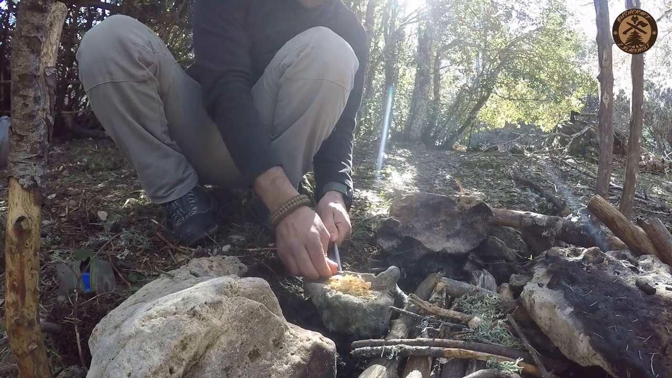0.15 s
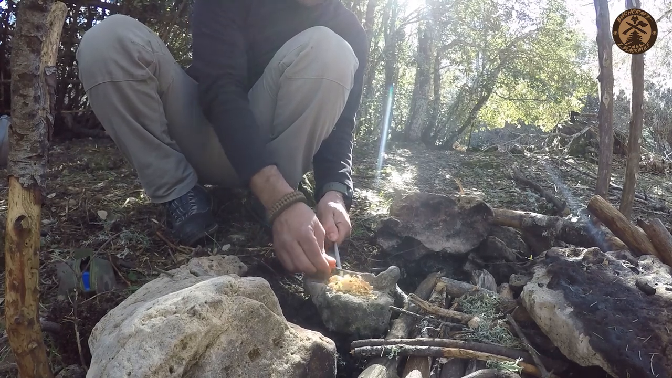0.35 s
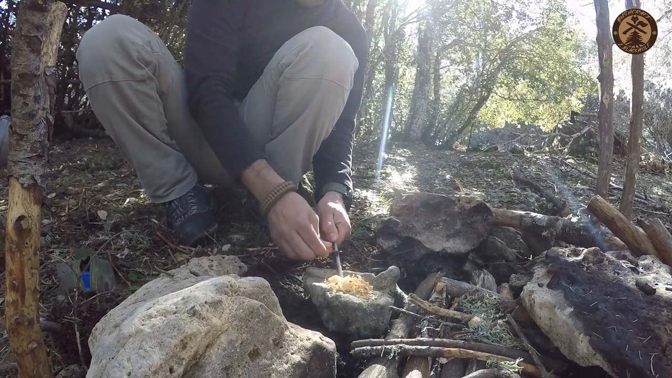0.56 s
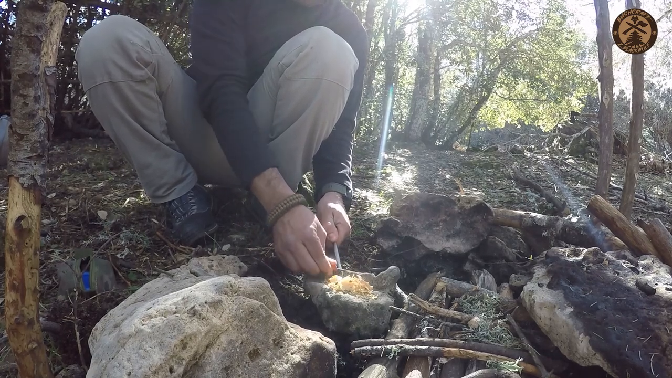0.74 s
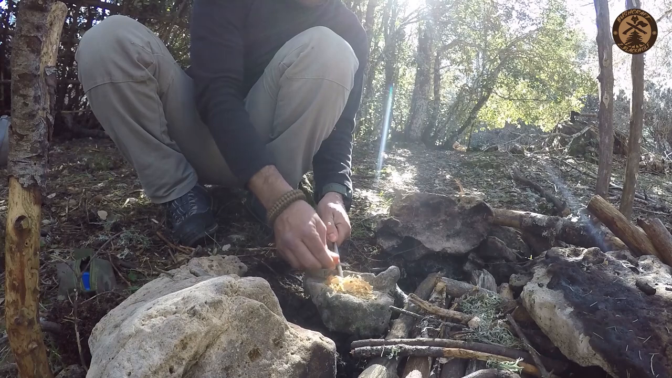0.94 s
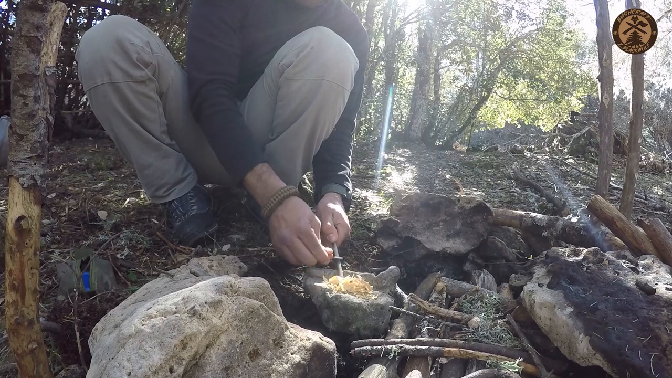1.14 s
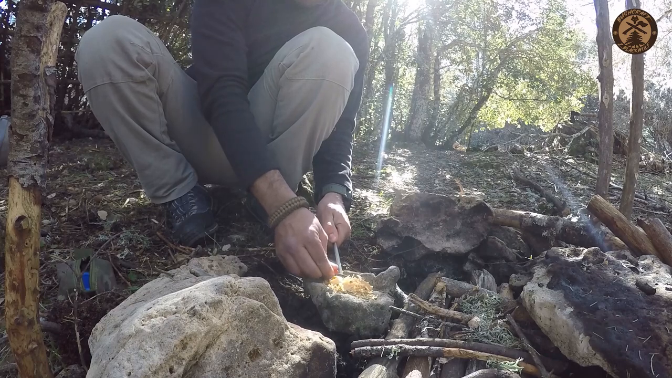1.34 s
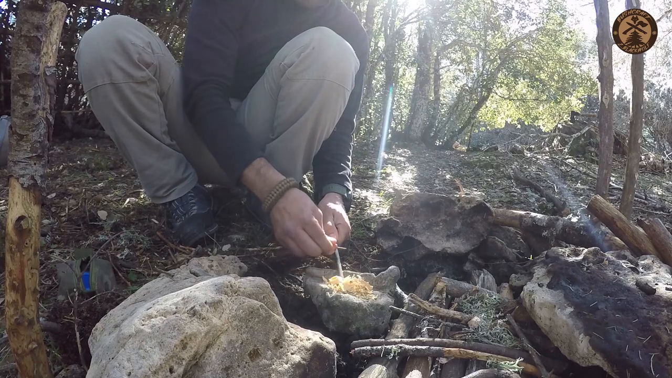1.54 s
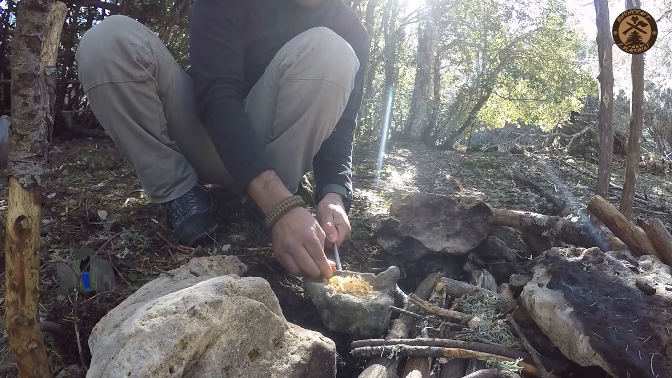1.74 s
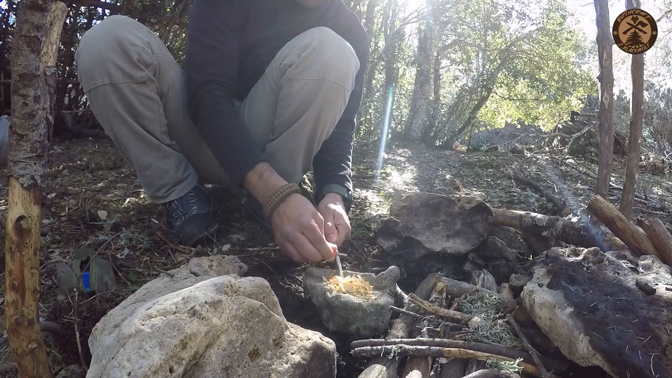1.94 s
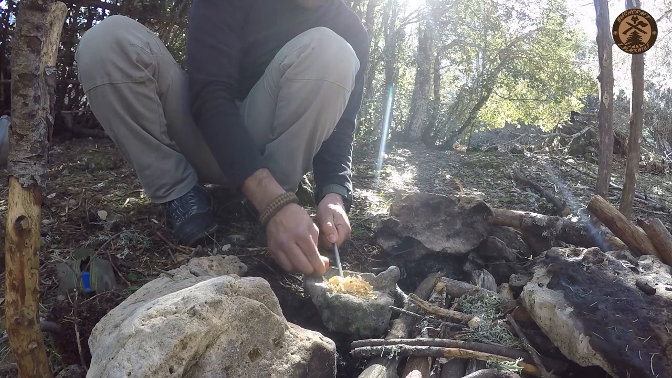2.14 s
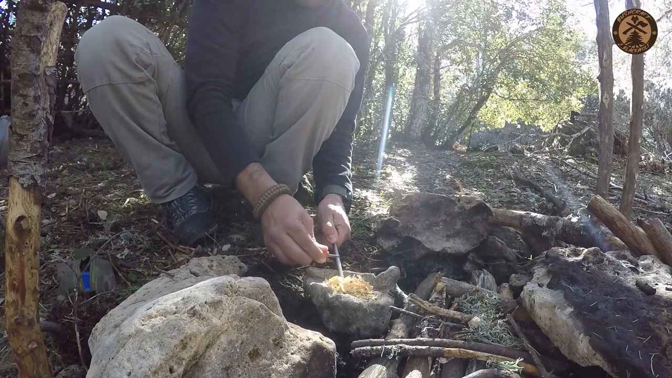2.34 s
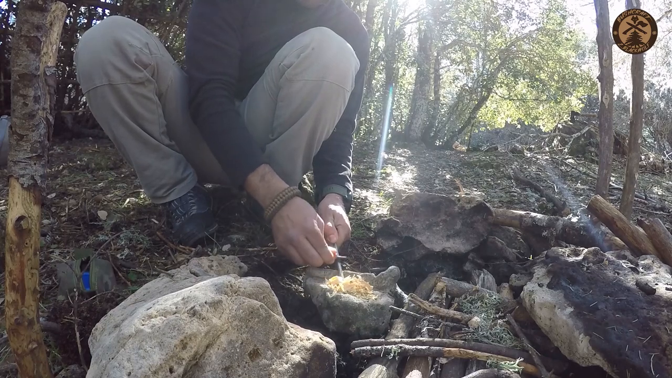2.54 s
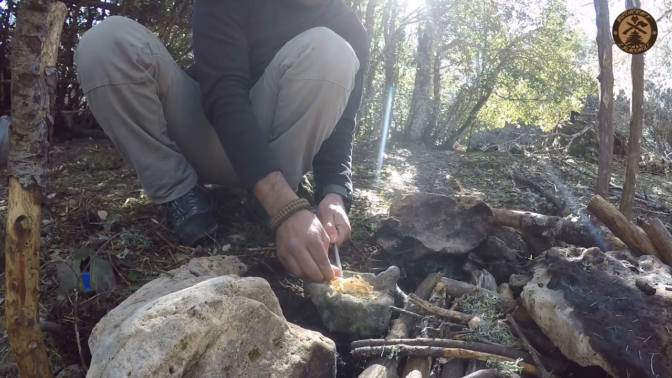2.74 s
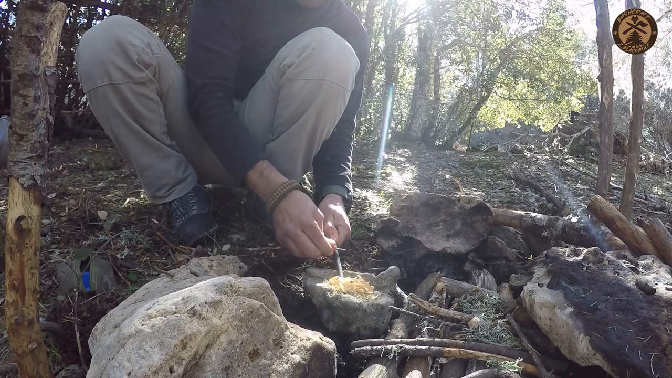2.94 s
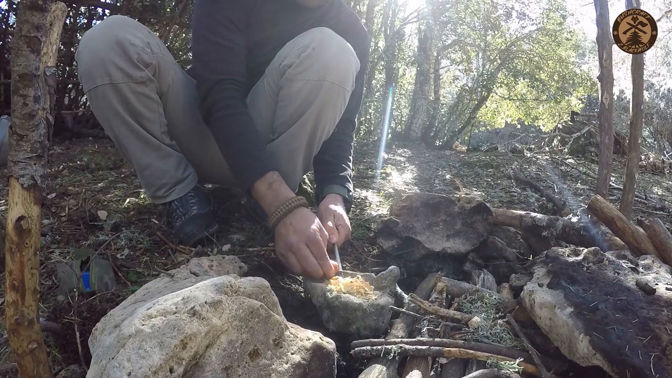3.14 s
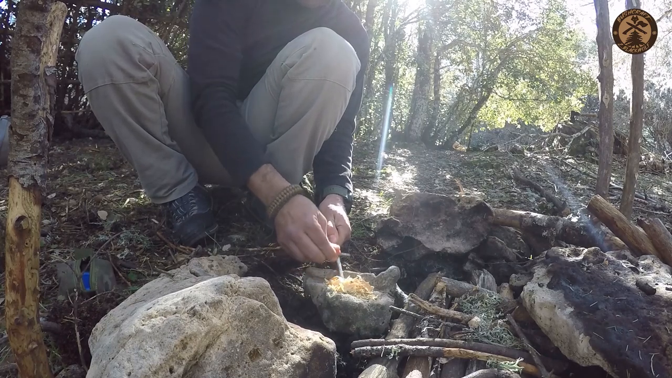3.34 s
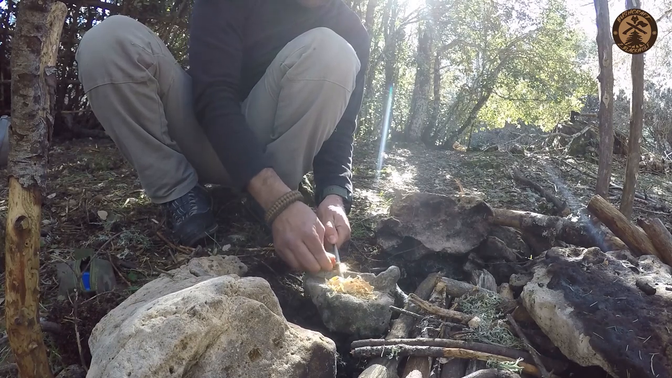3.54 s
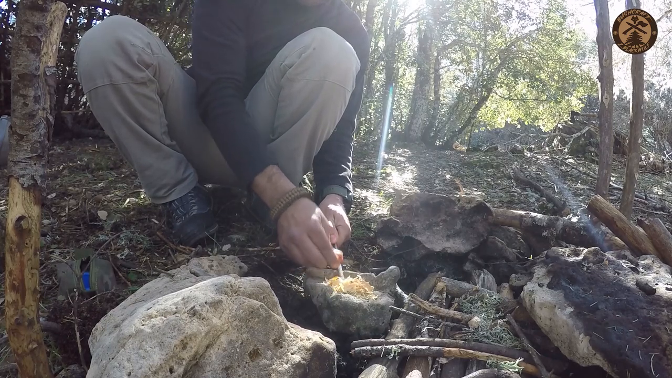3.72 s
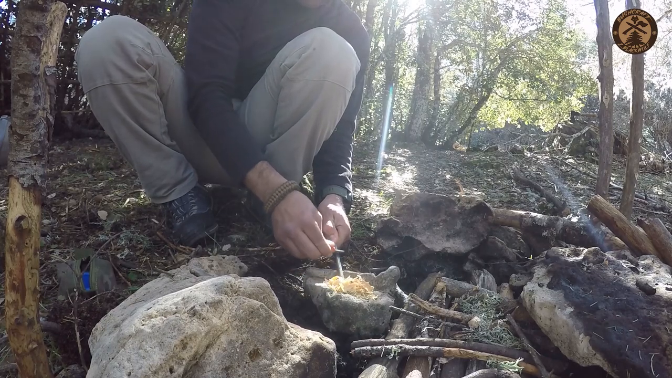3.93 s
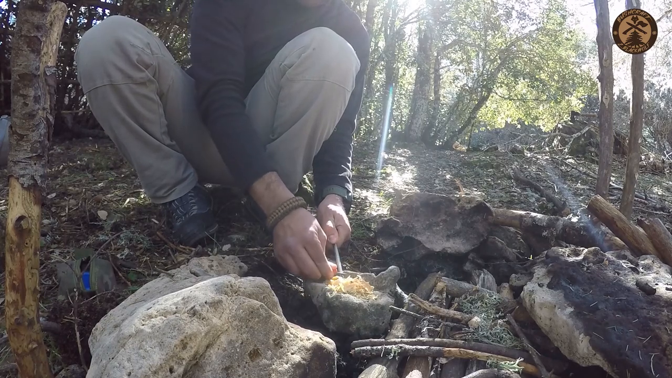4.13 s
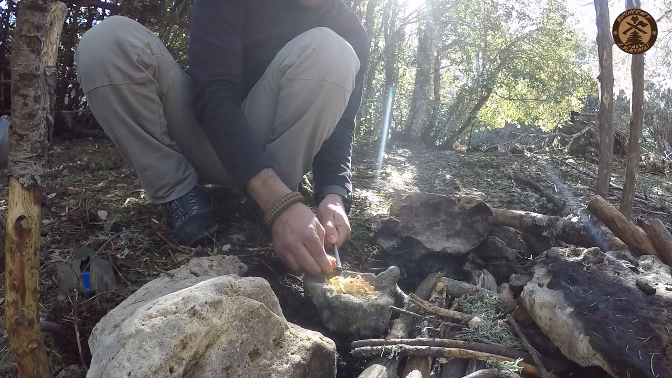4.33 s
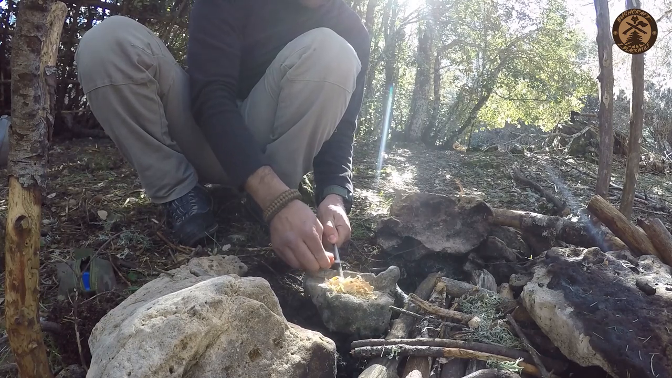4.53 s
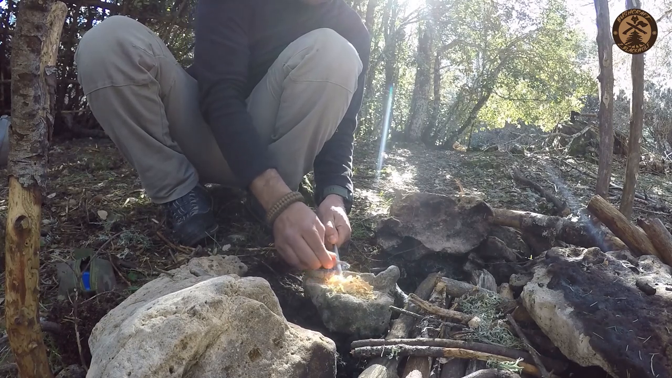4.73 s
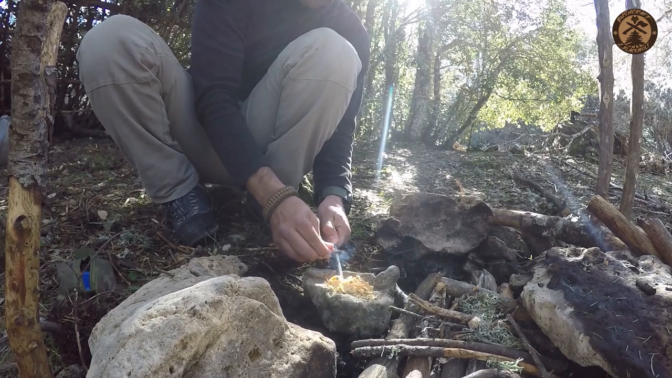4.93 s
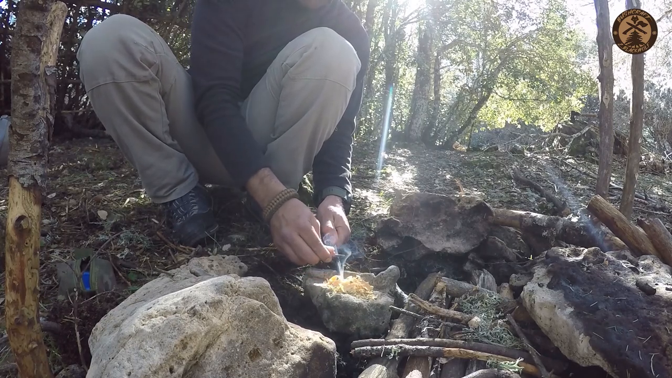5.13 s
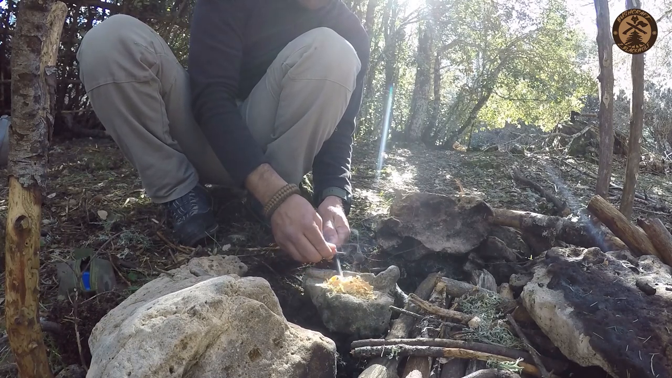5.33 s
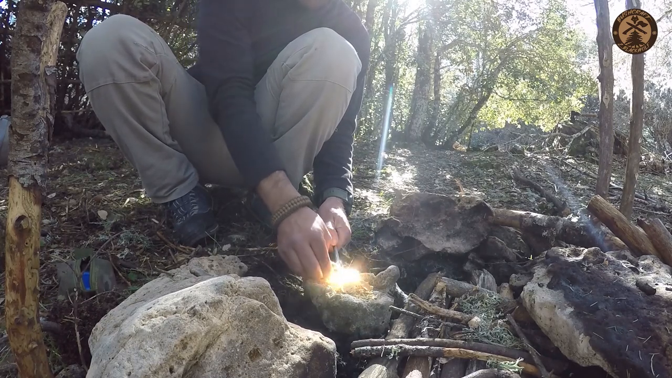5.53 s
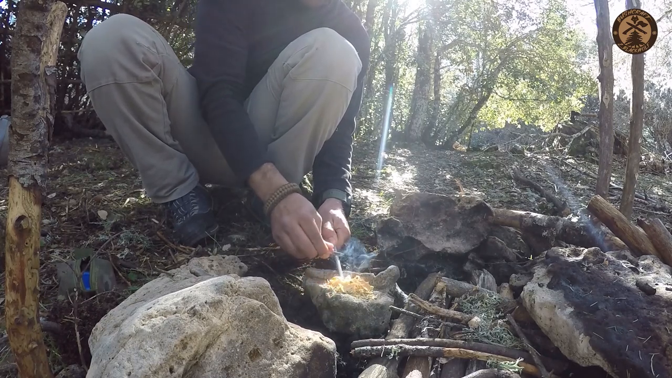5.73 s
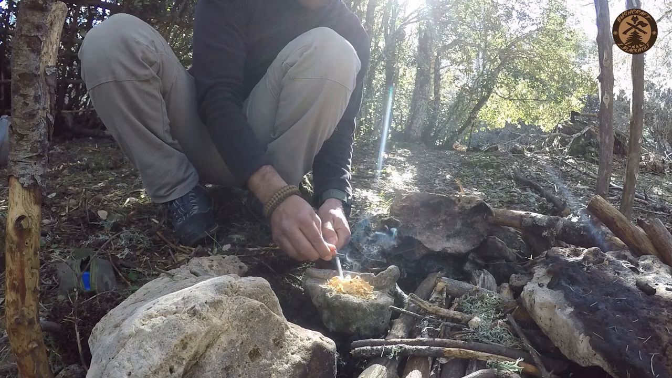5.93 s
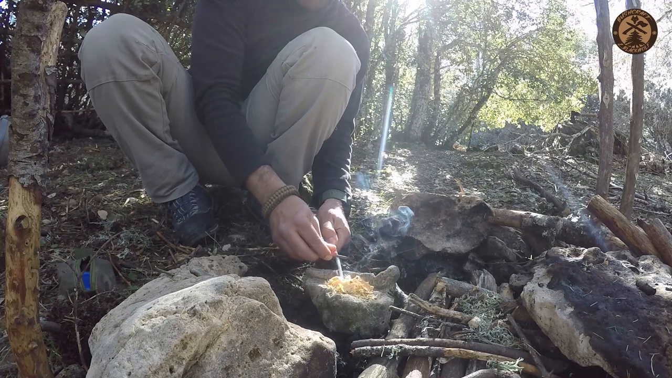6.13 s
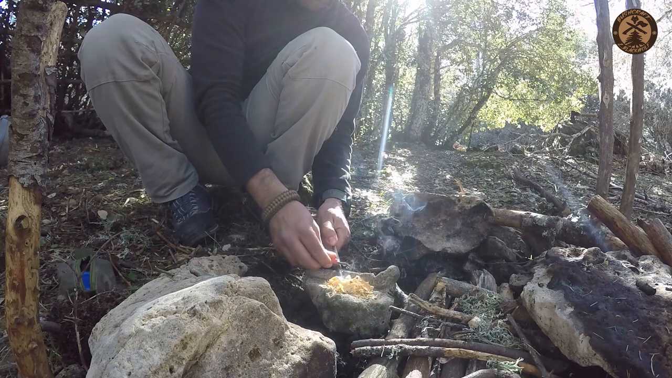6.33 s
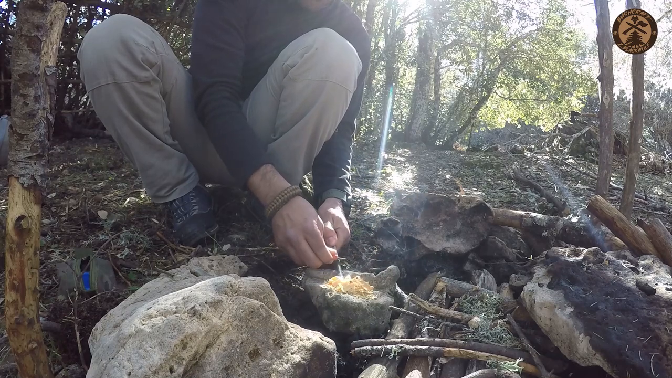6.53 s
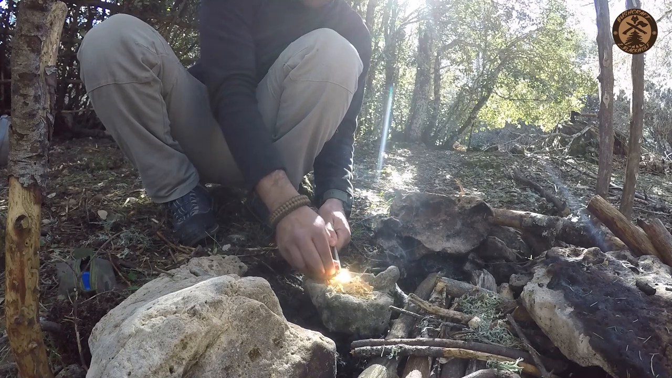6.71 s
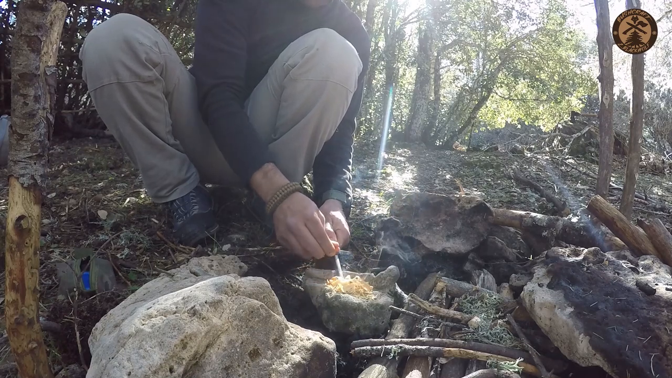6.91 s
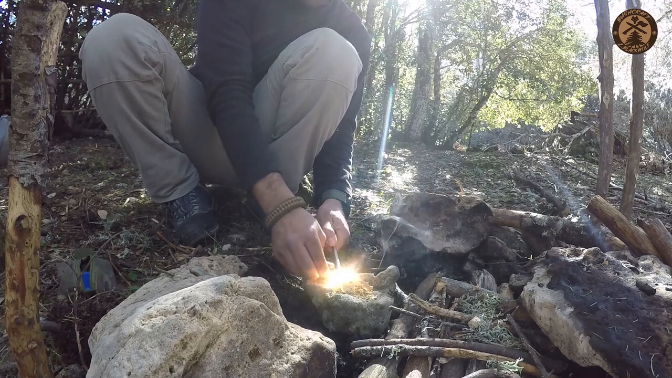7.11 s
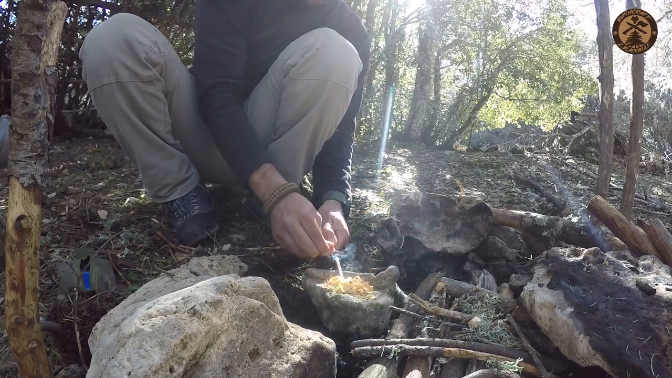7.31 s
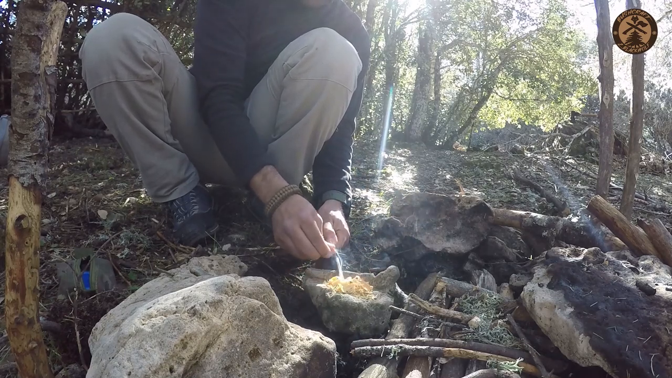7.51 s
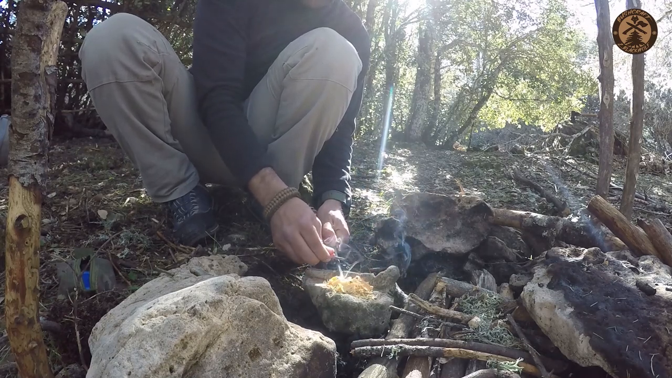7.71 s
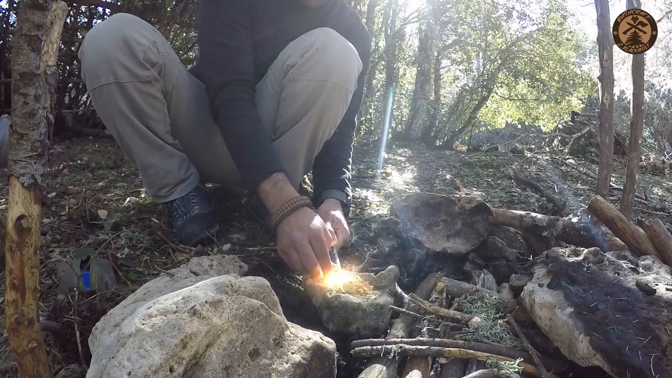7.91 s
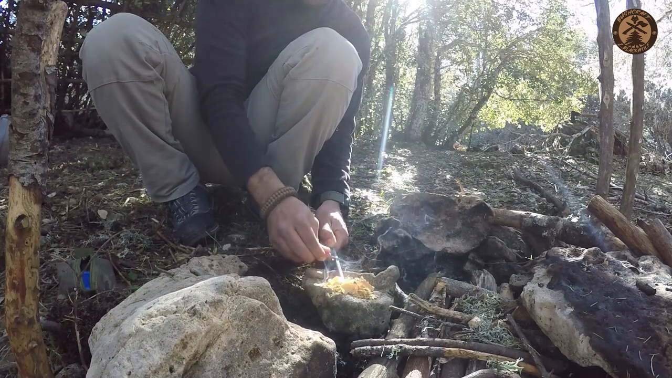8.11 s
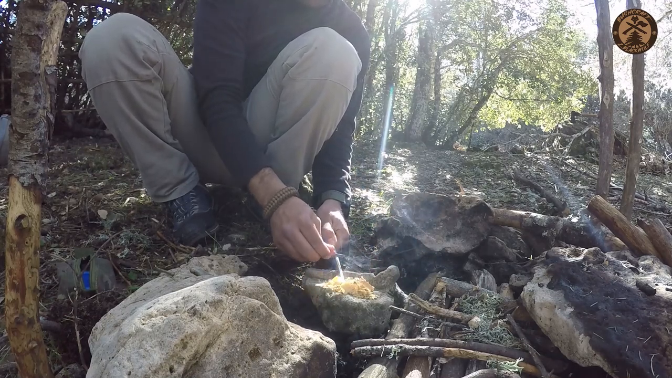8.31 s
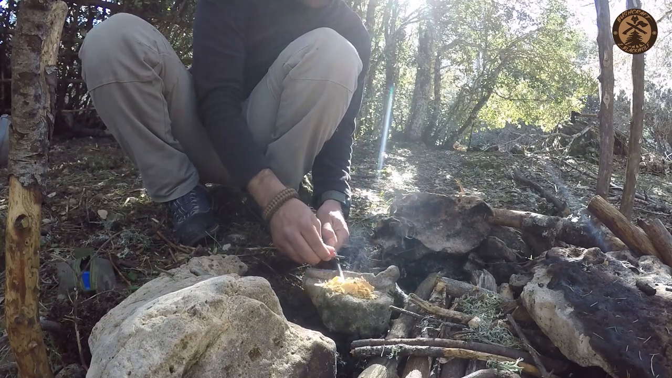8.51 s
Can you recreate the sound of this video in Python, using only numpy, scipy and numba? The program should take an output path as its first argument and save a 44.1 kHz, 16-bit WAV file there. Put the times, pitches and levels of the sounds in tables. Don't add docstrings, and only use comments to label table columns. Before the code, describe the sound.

In a quiet wood, faint far rumble and smooth leaf hiss sit under close, dry metal work, heard by a small camera a metre away. A light rasp is already running and stops around 0.4 s amid tiny snaps and soft bumps. From 0.6 to 4.4 s, short light scrapes come roughly every half second, each a thin bright tick and a hiss that dulls as it ends; a small clink rings at 3.5. At 4.6-4.9 two much harder, gritty strokes catch and crackle. Another grinds at 5.5-5.8, preceded by a clink. After a quieter gap with faint ticks and rubbing, hard scrapes return at 6.6 and 7.1, the latter breaking into crackle until 7.55. The strongest scrape starts at 7.9, bursting at 8.07-8.12 in the loudest cracks, then snaps and crackles scatter to about 8.65.

```python
import sys
import numpy as np
from scipy import signal
from scipy.fft import rfft, irfft
from scipy.io import wavfile
from scipy.ndimage import uniform_filter1d
from numba import njit

SR = 44100
rng = np.random.default_rng(int(sys.argv[2]) if len(sys.argv) > 2 else 0)


def undo_db(level):
    steps = np.asarray(level, float) / 20
    return 10 ** steps


def materialize(psi):
    bounded = np.clip(np.atleast_2d(psi).T, -1, 1)
    quanta = np.round(bounded * 32767).astype(np.int16)
    wavfile.write(sys.argv[1], SR, quanta)


N = 381906


@njit
def svf(x, hz, width):
    y, b, l = np.empty(len(x)), 0., 0.
    for i in range(len(x)):
        g, k = np.tan(np.pi * hz[i] / SR), width / hz[i]
        v = (b + g * (x[i] - l)) / (1 + g * (g + k))
        b, l, y[i] = 2 * v - b, l + 2 * g * v, k * v
    return y


def resonance(x, hz, width_hz):
    return svf(x, np.full(len(x), 1. * hz), 1. * width_hz)


def unit(x):
    return x / np.sqrt(np.mean(x ** 2))


def walk(rate_hz):
    hold = max(int(SR / rate_hz), 101)
    levels = rng.standard_normal(N // 100)[np.arange(N) // hold]
    return unit(uniform_filter1d(levels, hold))


def add(out, start_s, peak_db, sound):
    i = int(start_s * SR)
    out[i:i + len(sound)] += undo_db(peak_db) * sound / np.abs(sound).max()


def skipping_contact(count, rate_hz, spread_db, fade_s):
    when, size = rng.random(count), rng.exponential(size=count)
    jumps = (when < rate_hz / SR) * undo_db(spread_db * np.minimum(size, 3))
    fade = np.exp(-1 / (fade_s * SR))
    return unit(signal.lfilter([1], [1, -fade], jumps) + .5)


def band(x, hz, width_hz):
    return resonance(resonance(x, hz, width_hz), hz, width_hz)


def colour(x, ring_hz, width_hz, low_db, top_db):
    main = band(x, ring_hz, width_hz)
    bright = undo_db(-10.0) * band(x, 6800, 4600)
    low = undo_db(low_db + 0.5) * band(x, 2630, 6300)
    dull = signal.sosfilt(signal.butter(3, 9800, fs=SR, output="sos"), main + bright - low)
    return dull + undo_db(top_db + 1.5) * band(x, 11000, 7100)


# start_s, attack_s, hold_s, release_s, level_db
STROKES = [(-0.2, 0.049, 0.532, 0.061, -50), (0.611, 0.079, 0.16, 0.1, -47),
           (1.155, 0.054, 0.14, 0.13, -46), (1.654, 0.029, 0.16, 0.051, -47.5),
           (2.134, 0.012, 0.08, 0.012, -47), (2.581, 0.063, 0.085, 0.18, -44.5),
           (3.056, 0.036, .18, 0.054, -45.5), (3.512, 0.1, 0.041, .11, -42.5),
           (4.004, 0.025, 0.19, 0.097, -49.5), (4.305, 0.032, .135, 0.056, -51),
           (4.573, 0.11, 0.13, 0.079, -33), (4.857, 0.042, 0.0052, 0.023, -33.5),
           (5.476, 0.097, .22, 0.023, -37), (6.44, .05, 0.058, 0.073, -66),
           (6.633, 0.063, 0.14, 0.027, -38), (7.094, .11, 0.089, 0.039, -32.5),
           (7.876, .14, 0.062, 0.048, -29), (8.116, 0.0055, .002, 0.068, -32)]
# middle_s, extra_db, half_width_s
DIGS = [(0.29, -3.5, 0.028), (1.718, 1.5, 0.017), (2.72, 1, 0.02), (3.635, 3.5, 0.015), (4.144, 3.5, 0.047),
        (4.66, 2.5, 0.036), (4.79, -2.5, 0.011), (5.542, 3.5, 0.0048), (5.634, 10, 0.05),
        (5.685, -3.5, 0.015), (5.743, -6.5, 0.0058), (6.74, 4, 0.026), (6.795, 4.5, 0.018),
        (6.816, -5, 0.012), (7.196, 5.5, 0.029), (7.241, 4.5, 0.017), (7.3, -4.5, 0.011),
        (8.03, 1.5, 0.041)]


def strokes():
    t, level_db, along = np.arange(N) / SR, np.full(N, -120.), np.zeros(N)
    touch_db, lift_db = -27, -23
    for start_s, attack_s, hold_s, release_s, db in STROKES:
        u = t - start_s
        length_s = attack_s + hold_s + release_s
        on = (u >= 0) & (u <= length_s)
        bite = np.clip(1 - u[on] / attack_s, 0, 1)
        lift = np.clip((u[on] - attack_s - hold_s) / release_s, 0, 1)
        level_db[on] = db + touch_db * bite ** 2 + lift_db * lift
        along[on] = u[on] / length_s
    for middle_s, extra_db, half_s in DIGS:
        steepness = 1.45
        level_db += extra_db * np.clip(steepness * (1.2 - np.abs(t - middle_s) / half_s), 0, 1)
    return level_db, along


def slips(rate_hz, spread_db):
    when, size, sign = rng.random(N), rng.exponential(size=N), rng.standard_normal(N)
    return unit((when < rate_hz / SR) * sign * undo_db(spread_db * np.minimum(size, 3)))


def body(modes, fine, coarse, pressure, grit, patchy_db):
    out, power = 0, 0
    for hz, width_hz, light_db, hard_db in modes:
        centre = hz + 0.14 * width_hz * walk(12)
        own = rng.standard_normal(N)
        push = np.sqrt(1 - grit) * (fine + own) * 0.68 + np.sqrt(grit) * coarse
        once = svf(push, centre, 1.43 * width_hz)
        ring = unit(svf(once, centre, 1.43 * width_hz))
        gain = undo_db(light_db + (hard_db - light_db) * pressure)
        out = out + gain * undo_db(patchy_db * walk(45)) * ring
        power = power + gain ** 2
    return out / np.sqrt(power)


# pitch_hz, width_hz, light_pressure_db, hard_pressure_db
MAIN = [(3854, 710, -4, -3), (5200, 1200, 1, 5.5), (5800, 650, 0.5, 1.5), (6550, 860, 3, 3.5),
        (7200, 290, -10, -3), (7590, 1000, -4.5, 1), (8630, 1330, -2.5, 2), (9170, 1100, -16, -16.5)]
# pitch_hz, width_hz, light_pressure_db, hard_pressure_db
LOW = [(1235, 640, -7, -6), (1770, 110, -7.5, -7.5), (1970, 183, 1, -5), (2780, 860, -3, 1.5),
       (3280, 600, 0, -1)]
# pitch_hz, width_hz, light_pressure_db, hard_pressure_db
TOP = [(10180, 1300, -0.5, 5), (12100, 1400, -2.5, -1), (14000, 1500, -8.5, -8)]
# pitch_hz, width_hz, light_pressure_db, hard_pressure_db
STONE = [(125, 150, 1, -3.5), (381, 454, -1, -3.5), (820, 680, 0, -6)]


def scrape():
    level_db, along = strokes()
    light_db, hard_db = -45, -36
    pressure = np.clip((level_db - light_db) / (hard_db - light_db), 0, 1)
    grit = np.clip(0.15 + 0.28 * pressure, 0, 1)
    fine, coarse = slips(6000, spread_db=2.0), slips(900, spread_db=3.5)
    skips = skipping_contact(N, 300, spread_db=2.6, fade_s=.004)
    chatter = skips ** (.45 + .12 * pressure) * undo_db(.8 * walk(40))
    low_db = -9 + 1.5 * along + 2.5 * pressure
    faint_db = np.minimum(level_db + 47, 0)
    top_db = -9 - 20.5 * along - 9 * pressure + 1.3 * faint_db
    stone_db = -16.5 - 0.26 * pressure
    out = body(MAIN, fine, coarse, pressure, grit, patchy_db=2.5)
    out = out + undo_db(low_db) * body(LOW, fine, coarse, pressure, grit, patchy_db=1.04)
    out = out + undo_db(top_db) * body(TOP, fine, coarse, pressure, grit, patchy_db=-7.5)
    out = out + undo_db(stone_db) * body(STONE, fine, coarse, pressure, grit, patchy_db=0.5)
    return out * chatter * uniform_filter1d(undo_db(level_db), size=90)


# pitch_hz, level_db (per Hz)
WOOD = [(12, -33), (20, -2), (60, -1.5), (86, -10), (134, -15.5), (228, -21.5), (255, -21.5), (607, -27.5),
        (849, -28), (923, -29), (1150, -30.5), (3250, -32), (9140, -39.5), (14700, -44.5), (16000, -55)]
# time_s, level_db
FAR = [
    (0.0, -60.5),
    (0.09, -56),
    (0.38, -59.5),
    (6.37, -58.5),
    (6.49, -62.5),
    (7.14, -58),
    (8.66, -59),
]


def wood():
    hz = np.maximum(np.arange(N // 2 + 1) * SR / N, 1)
    tone_hz, tone_db = np.array(WOOD).T
    shape = undo_db(np.interp(np.log(hz), np.log(tone_hz), tone_db))
    bass = 1 / (1 + (hz / 150) ** 4)
    rumble = irfft(rfft(rng.standard_normal(N)) * shape * np.sqrt(bass), N)
    hiss = irfft(rfft(rng.standard_normal(N)) * shape * np.sqrt(1 - bass), N)
    far_s, far_db = np.array(FAR).T
    swell_db = np.interp(np.arange(N) / SR, far_s, far_db) - np.mean(far_db)
    return undo_db(-55.5) * unit(rumble * undo_db(swell_db) + hiss * undo_db(0.27 * walk(3.0)))


# start_s, peak_db, pitch_hz
BUMPS = [(0.089, -46, 118), (0.122, -44, 290), (4.669, -35.5, 132), (5.316, -49, 110), (5.336, -47, 135),
         (0.09, -46, 1250), (0.13, -44, 900), (5.9, -49, 130), (8.05, -43.5, 100), (0.105, -43.5, 200),
         (6.375, -50, 1500), (6.441, -47, 1550), (6.372, -53, 320), (6.438, -45.5, 324), (7.197, -48, 210),
         (7.532, -42, 560), (8.288, -36.5, 410), (0.86, -48, 830)]


def bumps():
    out, t = np.zeros(N + 4096), np.arange(4096) / SR
    for start_s, peak_db, hz in BUMPS:
        push = rng.standard_normal(len(t)) * np.exp(-t / 0.0037)
        knock = resonance(resonance(push, hz, 0.34 * hz), hz, 3.9 * hz)
        add(out, start_s, peak_db, knock)
    return out[:N]


# pitch_hz, width_hz, level_db
RINGS = [(1076, 600, -14.5), (1800, 106, -13), (2224, 170, -7), (3270, 320, -9.5), (3890, 80, -12.5),
         (5480, 170, -7.5), (6100, 430, -5), (8300, 310, -12), (9230, 240, -12), (9640, 170, -12.5),
         (11900, 240, -24)]


def ticks(rows, width_hz, low_db, top_db, t60_s, rings_db):
    out, t = np.zeros(N + 4096), np.arange(1024) / SR
    thin = signal.butter(3, 750, "high", fs=SR, output="sos")
    for start_s, peak_db, ring_hz in rows:
        blow = 0.23 * rng.standard_normal(len(t)) * np.exp(-np.log(1000) * t / t60_s)
        blow[0] = 1.67
        grip_db = rings_db + 2 * rng.standard_normal(len(RINGS))
        rings = 0
        for k, (hz, ring_width_hz, mode_db) in enumerate(RINGS):
            rings = rings + (-1) ** k * undo_db(mode_db + grip_db[k]) * resonance(blow, hz, ring_width_hz)
        tick = colour(blow, ring_hz, width_hz, low_db, top_db) + rings
        add(out, start_s, peak_db, signal.sosfilt(thin, tick))
    return out[:N]


# start_s, peak_db, pitch_hz (main ring)
SNAPS = [(0.3388, -32.5, 6350), (0.3702, -41, 6010), (0.392, -33.5, 4600), (0.6024, -54, 6400),
         (1.1139, -49.5, 3490), (1.439, -49, 4680), (2.3256, -49, 6340), (2.822, -30.5, 5770),
         (5.017, -37, 3450), (5.0687, -40.5, 3540), (5.2383, -44.5, 5620), (5.5388, -42, 5560),
         (5.9744, -47, 5300), (6.882, -47, 7500), (6.955, -53, 7000), (1.804, -23.5, 6600),
         (8.266, -35, 6600), (8.307, -42, 5500), (8.414, -46, 5670), (8.6138, -28, 5700),
         (8.6328, -27, 6050), (8.649, -41, 5500)]


def snaps():
    return ticks(SNAPS, width_hz=2200, low_db=-33, top_db=-22, t60_s=0.013, rings_db=-2.5)


# start_s, peak_db, pitch_hz (main ring)
LANDINGS = [(0.5855, -28, 5960), (1.1578, -17.5, 6350), (1.652, -13.5, 6550), (2.1311, -16.5, 6800),
            (2.5955, -13.5, 5900), (3.046, -21.5, 5860), (3.5079, -14, 6550), (4.0091, -21.5, 5960),
            (6.0453, -34, 8900), (6.4089, -23, 6060), (7.0411, -14, 7860), (8.4804, -33, 4850)]


def landings():
    return ticks(LANDINGS, width_hz=2460, low_db=-16, top_db=-40, t60_s=0.0078, rings_db=1)


# start_s, peak_db, pitch_hz (main colour), length_s
CRACKLES = [(2.223, -22.5, 4500, 0.0043), (2.242, -46, 6290, 0.05), (4.931, -42, 6000, 0.018),
            (4.949, -29, 6850, 0.025), (4.972, -27, 5700, 0.028), (4.991, -45, 6000, 0.086),
            (5.007, -42, 5000, 0.0077), (5.085, -30.5, 4770, 0.024), (5.369, -52.5, 8900, 0.023),
            (5.819, -44, 5000, 0.025), (5.847, -35.5, 5360, 0.034), (5.892, -45, 5670, .04),
            (7.323, -23, 5200, 0.045), (7.357, -15.5, 6300, 0.011), (7.365, -23.5, 5700, 0.062),
            (7.429, -26.5, 6230, 0.031), (7.46, -34, 4800, 0.013), (7.48, -46, 6500, 0.03),
            (7.532, -28, 5470, 0.037), (8.072, -7.5, 4900, 0.0027), (8.116, -10, 4750, 0.0042),
            (8.186, -35.5, 5793, 0.0066), (8.239, -44, 6000, 0.026), (8.264, -31, 5940, 0.021),
            (8.297, -40.5, 4640, 0.084), (8.346, -22.5, 5800, 0.02), (8.353, -31, 5800, 0.033),
            (8.595, -41, 5840, 0.016)]


def crackles():
    out, t = np.zeros(N + 4096), np.arange(4096) / SR
    for start_s, peak_db, ring_hz, length_s in CRACKLES:
        noise = rng.standard_normal(len(t))
        grains = noise * skipping_contact(len(t), 260, spread_db=4.0, fade_s=0.00057)
        run = np.clip((length_s - t) / 0.0059, 0, 1) * np.exp(-1.1 * t / length_s)
        add(out, start_s, peak_db, colour(grains * run, ring_hz, 6200, low_db=-7, top_db=-15))
    return out[:N]


# start_s, peak_db, pitch_hz (main ring)
CATCHES = [(2.2237, -15.5, 3780), (4.641, -15, 6300), (4.6597, -15, 3260), (4.8632, -22.5, 6970),
           (4.8916, -18, 8500), (4.915, -23, 3030), (4.9839, -21, 3630), (5.5891, -15, 5000),
           (5.7208, -14.5, 5600), (6.7964, -21.5, 7200), (6.8338, -22, 3240), (7.185, -16, 5800),
           (7.323, -15, 5200), (7.3344, -17, 8800), (7.3615, -11, 6500), (7.444, -21, 6060),
           (7.5328, -21, 4480), (7.9596, -15, 3080), (7.9835, -12, 5900), (8.0376, -15, 6400),
           (8.0688, -2, 5200), (8.0977, -15, 7480), (8.1184, -7.5, 4880), (8.2748, -17.5, 7600),
           (8.2863, -25, 6500), (8.2885, -14, 5860), (8.2895, -10, 3930), (8.3453, -23, 6250),
           (8.3654, -21, 5470)]


def catches():
    return ticks(CATCHES, width_hz=2130, low_db=-18, top_db=-23.5, t60_s=0.0065, rings_db=1)


# start_s, peak_db, pitch_hz (main ring)
CLINKS = [
    (3.0723, -39, 1800),
    (3.5442, -30, 1830),
    (5.1967, -37.5, 1800),
    (5.32, -50, 1690),
    (5.5137, -27.5, 1980),
    (4.0095, -28, 1800),
    (7.707, -45.5, 2400),
]


def clinks():
    return ticks(CLINKS, width_hz=520, low_db=-13, top_db=-26, t60_s=0.019, rings_db=-26)


# start_s, length_s, pitch_hz, level_db
RETURN = [
    (6.45, 0.15, 1700, -68),
    (6.865, .17, 1650, -66),
    (7.052, .11, 1860, -68),
]


def slide_back():
    t, hz, gain = np.arange(N) / SR, np.full(N, 1600.), np.zeros(N)
    for start_s, length_s, ring_hz, level_db in RETURN:
        on = (t >= start_s) & (t <= start_s + length_s)
        hz[on] = ring_hz
        gain[on] = undo_db(level_db) * np.abs(np.sin(np.pi * (t[on] - start_s) / length_s)) ** .15
    once = svf(rng.standard_normal(N), hz, 240.)
    rub = unit(svf(once, hz, 240.)) * undo_db(1.4 * walk(40))
    return rub * uniform_filter1d(gain, size=400)


def scene():
    near = scrape() + landings() + catches() + snaps() + clinks() + crackles() + bumps() + slide_back()
    t, t60_s = np.arange(SR // 3) / SR, .12
    scatter = rng.standard_normal(len(t)) * np.exp(-np.log(1000) * t / t60_s) * (t > .003)
    echo = undo_db(-30) * scatter / np.sqrt(np.sum(scatter ** 2))
    trees = signal.fftconvolve(near, echo)[:N]
    return (near + trees + wood())[None]


def low_pass(x):
    return signal.sosfilt(signal.butter(12, 16510, fs=SR, output="sos"), x)


def record(dry):
    cut = signal.sosfilt(signal.ellip(8, .2, 24, 15350, fs=SR, output="sos"), dry)
    return low_pass(cut)


dry = scene()
out = record(dry)
materialize(out)
```